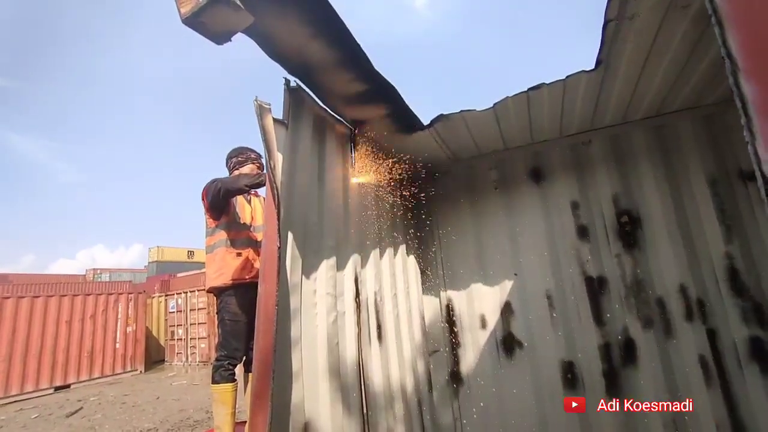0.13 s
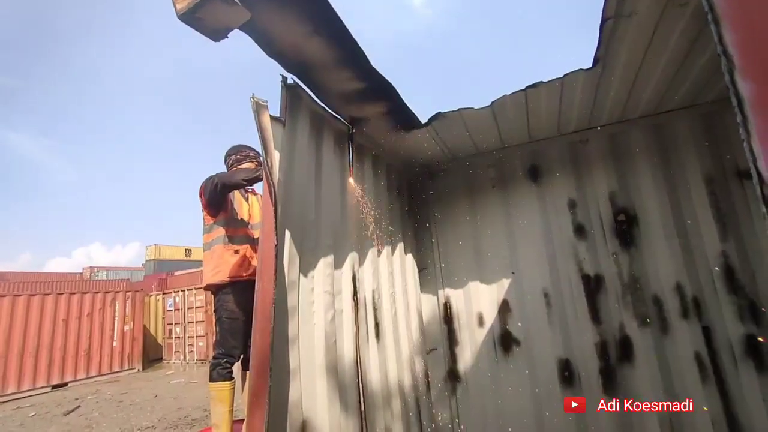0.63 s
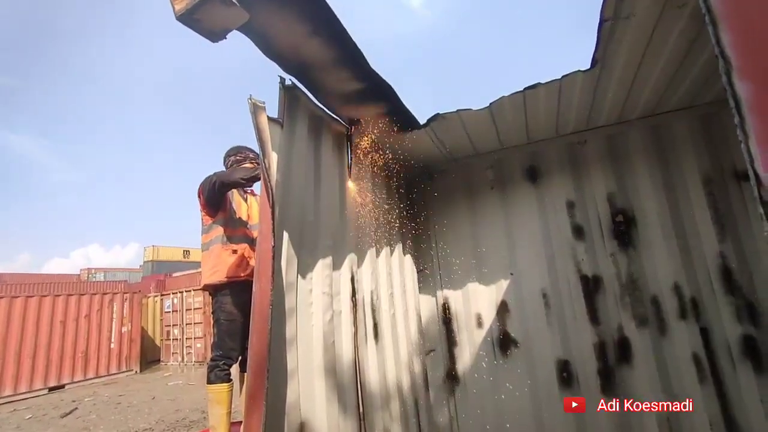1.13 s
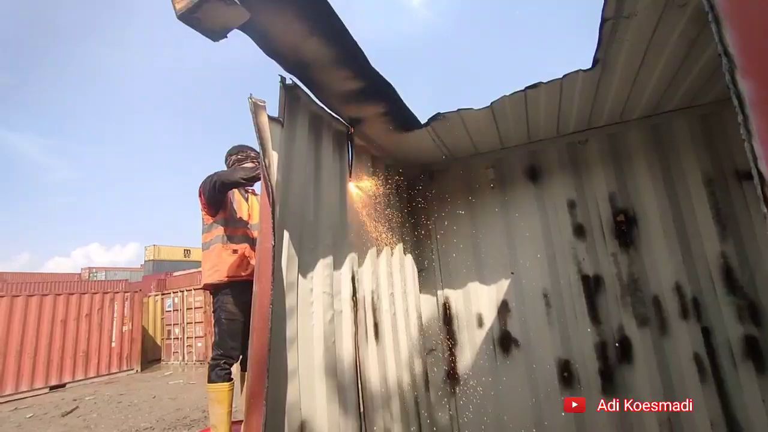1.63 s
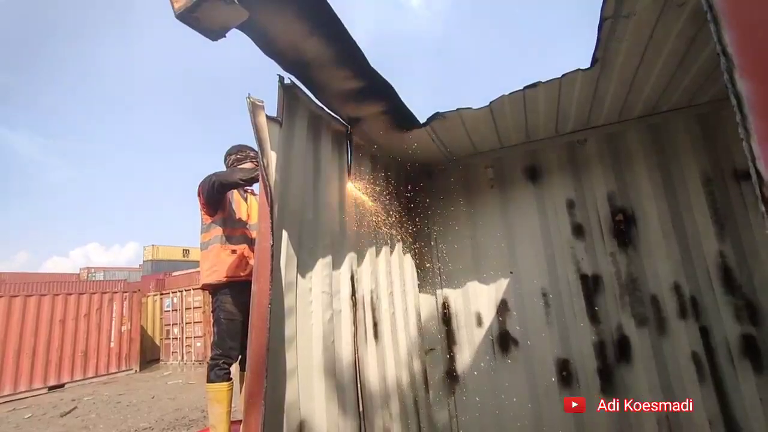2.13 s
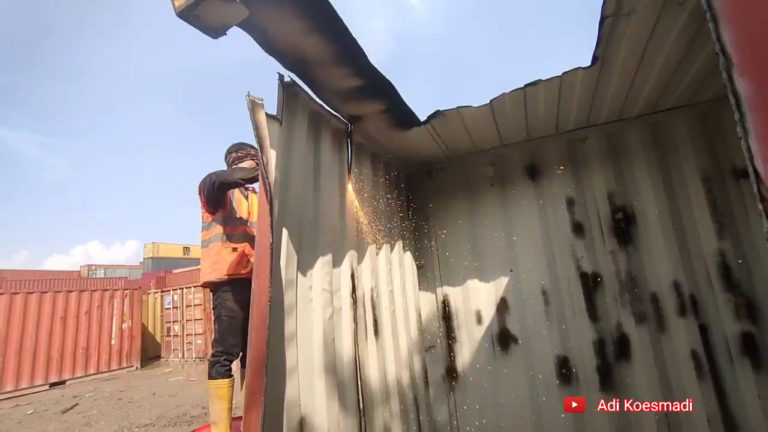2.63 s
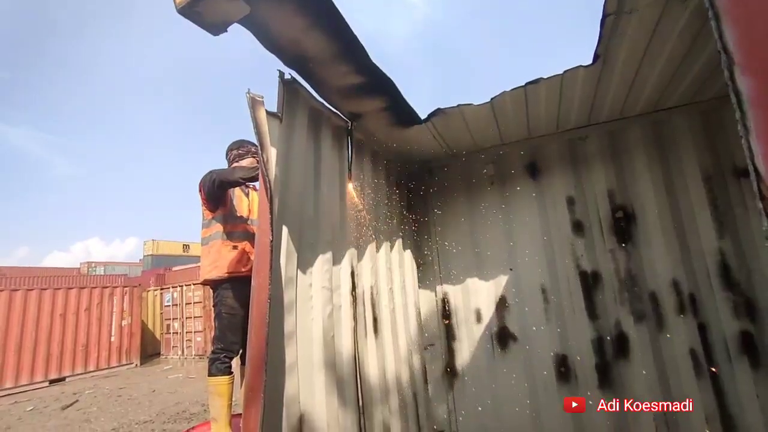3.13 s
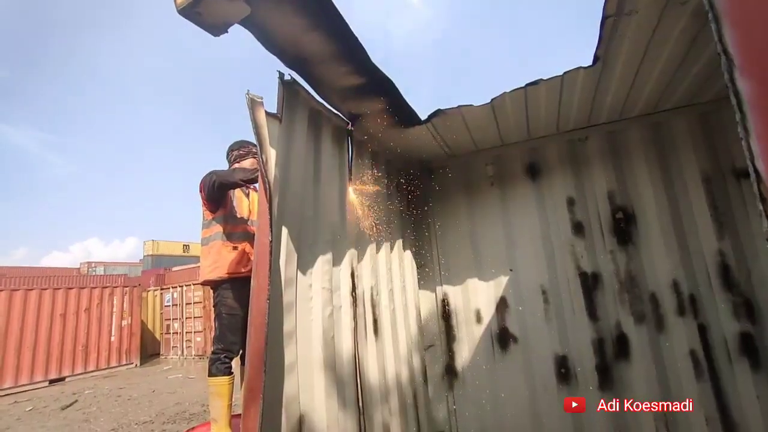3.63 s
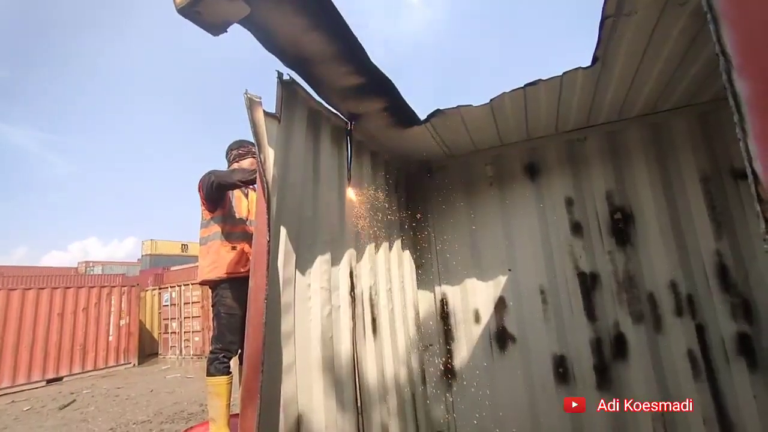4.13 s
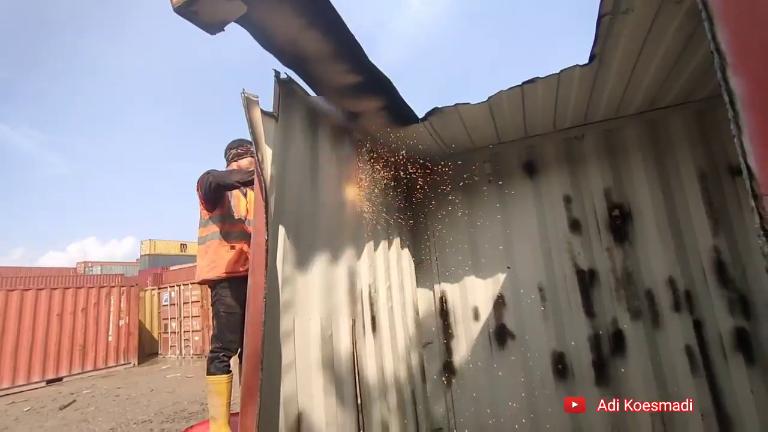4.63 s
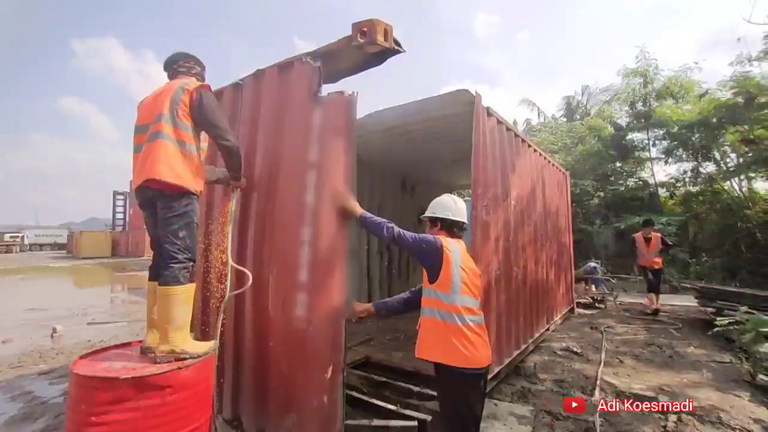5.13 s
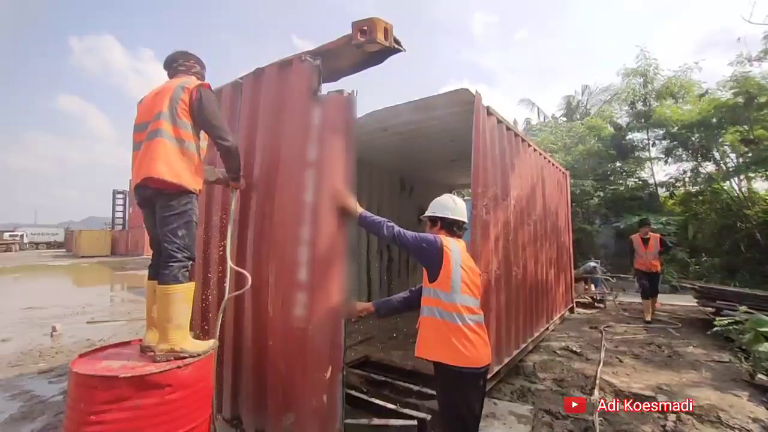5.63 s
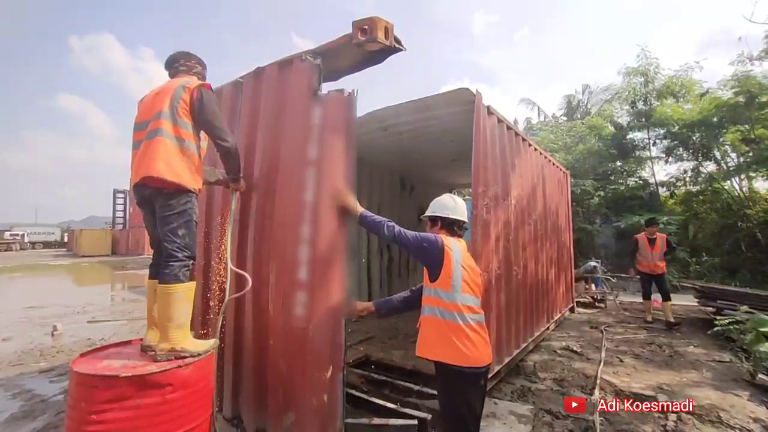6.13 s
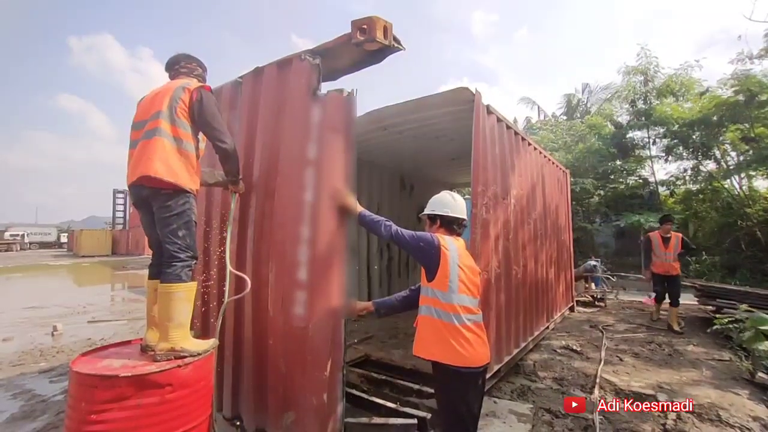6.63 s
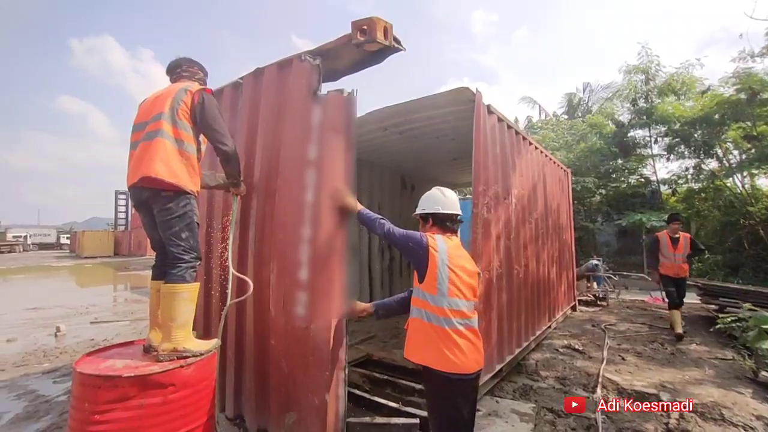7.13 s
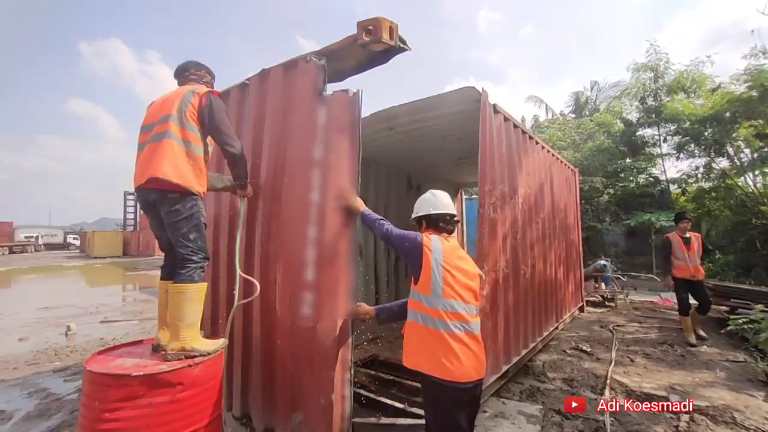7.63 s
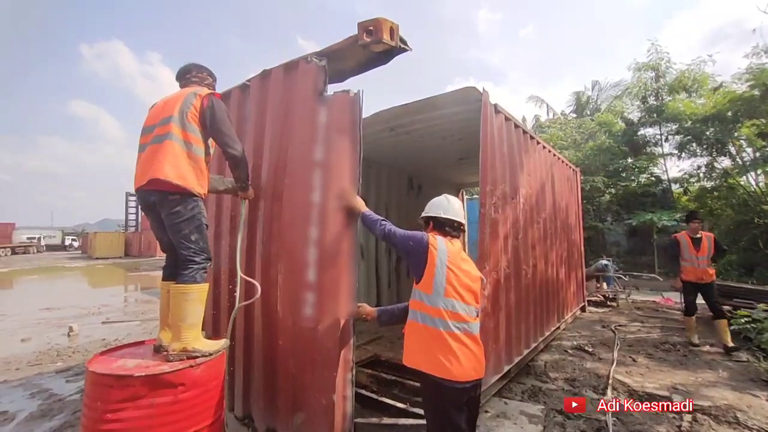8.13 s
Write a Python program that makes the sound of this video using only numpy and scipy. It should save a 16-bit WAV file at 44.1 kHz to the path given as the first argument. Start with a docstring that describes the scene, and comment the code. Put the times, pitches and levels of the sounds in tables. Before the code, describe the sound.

A cutting torch hisses and sizzles steadily inside a ringing steel box, stops dead briefly, then resumes outdoors over a fuller low engine rumble.

```python
"""An open yard, where an oxy-fuel torch cuts the wall of a steel container, heard first from inside the box and,
after a short silence, from outside. The torch is shaped noise in four fluttering bands: flame roar, kerf howl,
oxygen jet and spatter sizzle; resonances and short echoes make the sheet walls ring. Behind it a distant diesel
drones as a wavering sine, engine hums glide in and out, machines rumble as low noise bands,
and a light wind buffets the microphone ports as very low noise."""
import sys
import numpy as np
from scipy import signal
from scipy.fft import irfft, next_fast_len
from scipy.io import wavfile
from scipy.ndimage import uniform_filter1d

SR = 44100
rng = np.random.default_rng(int(sys.argv[2]) if len(sys.argv) > 2 else 0)


def field_ratio(decibels):
    """Amplitude ratio for a level in dB (20 dB per decade); scalars and array-likes work."""
    return 10 ** (np.asarray(decibels, dtype=float) / 20)


def generate_wav(sig):
    """Save sig (samples, or channels by samples) to the path in sys.argv[1] as 16-bit PCM at SR."""
    pcm = np.round(np.clip(np.atleast_2d(sig).T, -1, 1) * 32767).astype(np.int16)
    wavfile.write(sys.argv[1], SR, pcm)


N = 364266  # samples


def table(rows, x):
    """Columns of a table read at x along straight lines."""
    first, *columns = np.transpose(rows)
    return [np.interp(x, first, column) for column in columns]


def on_log(rows, hz):
    """A spectrum table read on a log-frequency axis."""
    rows = np.array(rows, float)
    return np.interp(np.log(hz), np.log(rows[:, 0]), rows[:, 1])


def unit(ears):
    """Scale both ears together so that their mean has rms 1."""
    return ears / np.sqrt(np.mean(ears.mean(0) ** 2))


def walk(rate, n):
    """Random levels held 1 / rate s and smoothed twice, pulled back to zero within a few steps; spread near 1."""
    hold = max(int(SR / rate), 2)
    steps = np.repeat(rng.standard_normal(n // hold + 1), hold)[:n]
    smooth = uniform_filter1d(uniform_filter1d(steps, hold), hold)
    drift = uniform_filter1d(smooth, 5 * hold)
    return 1.5 * (smooth - drift)


def sine(hz):
    """A tone of rms 1 that follows the frequency curve hz."""
    return np.sqrt(2) * np.sin(2 * np.pi * np.cumsum(hz) / SR)


# Diffuse stereo width, inside then outside. Each row: frequency in Hz, side minus mid in dB.
SIDE_SPECTRUM = [
    [(60, -9.5), (110, -11), (200, -12), (380, -14.5), (700, -13), (1290, -5.5), (2380, 0), (4400, 1),
     (8120, -1.5), (15000, -2)],
    [(60, -15), (110, -20), (200, -14.5), (380, -11), (700, -13), (1290, -1), (2380, -5), (4400, 0.5),
     (8120, 0.5), (15000, -1.5)],
]
# Stereo balance, inside then outside. Each row: frequency in Hz, left minus right in dB.
EAR_BALANCE = [
    [(60, -0.5), (110, -0.5), (200, 1), (380, 1.5), (700, -0.5), (1290, 2), (2380, 5), (4400, -2),
     (8120, 1.5), (15000, -1)],
    [(60, -2), (110, -1.5), (200, 1.5), (380, 1.5), (700, -0.5), (1290, 0.5), (2380, 4), (4400, -0.5),
     (8120, 2.5), (15000, 0)],
]
# Direct path from the source, one row for inside, one for outside.
# Each row: lead of the left port in seconds, level over the diffuse side part in dB.
DIRECT_PATH = [(.00004, -2.5), (.00028, -2)]


def wide_noise(place, hz, echo_db, echo_s):
    """Left and right noise spectra: alike in the bass, apart in the treble, each ear with its own wall echoes."""
    mid, side, direct = rng.standard_normal((3, len(hz))) + 1j * rng.standard_normal((3, len(hz)))
    spread = field_ratio(on_log(SIDE_SPECTRUM[place], hz))
    half_balance_db = on_log(EAR_BALANCE[place], hz) / 2
    # the direct path reaches the left port a little before the right
    lead_s, direct_db = DIRECT_PATH[place]
    skew = np.exp(1j * np.pi * hz * lead_s)
    shared_lags = rng.uniform(0.0994, 1, 6) * echo_s
    ears = []
    for sign in (1, -1):  # left, right
        lags = shared_lags + 6e-5 * rng.standard_normal(6)
        reflections = np.exp(-2j * np.pi * np.outer(lags, hz)).sum(0)
        echoes = 1 + field_ratio(echo_db) * reflections
        apart = sign * side + field_ratio(direct_db) * direct * skew ** sign
        ears.append((mid + spread * apart) * field_ratio(sign * half_balance_db) * echoes)
    return np.array(ears)


def flutter(parts, hz, s, lo_hz, hi_hz, all_db, near_db, own_db, rate):
    """Third-octave bands whose levels walk: all together, with neighbours and alone; a second part swells slowly."""
    ring_swell_db, ring_swell_rate = 4, 2.975  # rate in steps per second
    n, out, near = len(s), 0, 0
    together = walk(rate, n)
    centres = np.log2(lo_hz) + np.arange(int(3 * np.log2(hi_hz / lo_hz)) + 1) / 3
    for centre in centres:
        # cosine-squared skirts cross-fade each band into the next
        share = np.cos(np.pi / 2 * np.clip(3 * (np.log2(hz) - centre), -1, 1)) ** 2
        # each band inherits most of its lower neighbour's movement
        near = .8 * near + .6 * walk(rate / 2, n)
        level_db = all_db * together + near_db * near + own_db * walk(rate / 4, n)
        band, *rings = (irfft(part * share)[:, :n] for part in parts)
        # as the torch moves along the sheet its rings swell and fade
        for ring in rings:
            band = band + ring * field_ratio(ring_swell_db * walk(ring_swell_rate, n))
        out = out + band * field_ratio(level_db)
    return out


# Gusts on the ports, inside then outside. Each row: time in seconds, mean level in dB.
WIND_GUSTS = [
    [(0, -61), (1.5, -65), (2.5, -62), (4.5, -60)],
    [(4.9, -66), (5.8, -58), (6.3, -60), (7.4, -52), (7.7, -57), (8.26, -61)],
]


def wind(place, s):
    """Turbulence at the microphone ports: noise between about 14 and 45 Hz, partly shared by both ears."""
    low_pass = signal.butter(2, 45, fs=SR, output="sos")
    high_pass = signal.butter(2, 14, "high", fs=SR, output="sos")
    shared, left, right = signal.sosfilt(low_pass, rng.standard_normal((3, len(s))))
    puffs = signal.sosfilt(high_pass, shared + .7 * np.array([left, right]))
    gust_db = table(WIND_GUSTS[place], s)[0]
    return unit(puffs) * field_ratio(gust_db + 3.0 * walk(8, len(s)))


# Tone of the machines, inside then outside. Each row: frequency in Hz, relative density in dB per Hz.
MACHINE_COLOUR = [
    [(12, -30), (20, -1.5), (91, -9.5), (113, -12), (188, 3), (262, -5.5), (294, 11), (347, -7), (389, -7),
     (420, -2), (550, -32), (920, -120)],
    [(12, -34), (20, -4), (43, -13), (70, -14), (92, -5.5), (139, -7.5), (201, -1.5), (249, -2.5),
     (343, -0.5), (420, -7), (550, -37), (920, -120)],
]
# Other yard machines, inside then outside.
# Each row: time in seconds, deep rumble level in dB, boom of the box level in dB.
MACHINE_LEVELS = [
    [(0, -56.5, -52), (.5, -58.5, -53.5), (1.45, -60.5, -54), (1.85, -59, -52), (2.5, -60, -54.5),
     (2.9, -64.5, -55.5), (3.4, -60.5, -52.5), (3.9, -62, -57), (4.53, -63, -52)],
    [(4.89, -53, -41.5), (5.15, -53.5, -47), (5.7, -49, -46.5), (6.4, -51.5, -44), (6.8, -54.5, -45.5),
     (7.8, -52.5, -47), (8.26, -51, -43)],
]


def machines(place, s, hz):
    """Low noise of yard machines in two bands, a deep rumble and the boom of the box, with faint echoes."""
    rumble_db, boom_db = table(MACHINE_LEVELS[place], s)
    far = wide_noise(place, hz, echo_db=-34.5, echo_s=0.022) * field_ratio(on_log(MACHINE_COLOUR[place], hz))
    rumble = flutter([far], hz, s, 62.5, 130, all_db=.5, near_db=.8, own_db=1.2, rate=16)
    boom = flutter([far], hz, s, 157.5, 260, all_db=.5, near_db=.8, own_db=1.2, rate=16)
    return unit(rumble) * field_ratio(rumble_db) + unit(boom) * field_ratio(boom_db)


# Engine hums that come and go.
# Each row: start in seconds, end in seconds, first mean pitch in Hz, last mean pitch in Hz, mean level in dB.
ENGINE_HUMS = [(1.801, 2.72, 87.1, 90.2, -59), (5.6, 6.65, 85.3, 88.8, -55.5),
               (6.9, 7.55, 117.6, 114.6, -55), (5.05, 5.5, 206, 215.5, -50), (6.3, 6.604, 212, 204, -49),
               (6.55, 7.197, 183, 193, -48), (6.8, 7.85, 232.7, 251, -49), (7.4, 8.26, 198, 205.7, -48.5)]


def hum():
    """Soft low tones of engines far off: gliding sines, each of which swells, wavers and fades."""
    out = np.zeros(N)
    for start_s, end_s, first_hz, last_hz, db in ENGINE_HUMS:
        i = np.arange(int(start_s * SR), min(int(end_s * SR), N))
        hz = np.linspace(first_hz, last_hz, len(i)) * (1 + 0.005 * walk(7.1, len(i)))
        to_nearest_end_s = np.minimum(i / SR - start_s, end_s - i / SR)
        fade = np.clip(to_nearest_end_s / 0.095, 0, 1)
        out[i] += sine(hz) * field_ratio(db + 2.5 * walk(6.8, len(i))) * fade
    return out


# Nearest diesel, inside then outside. Each row: time in seconds, mean firing rate in Hz, mean drone level in dB.
DIESEL_DRONE = [
    [(0, 41, -74), (.4, 41.3, -66.5), (1.7, 40.4, -58), (2.06, 40.8, -56), (2.45, 41.1, -71),
     (2.9, 41.4, -68), (3.15, 40.9, -62), (3.7, 41, -61), (4.3, 41.2, -52.5), (4.53, 41, -58)],
    [(4.89, 45.55, -53), (5.5, 42.94, -60), (5.73, 43.4, -50), (6.15, 43.1, -51), (6.55, 44, -46),
     (6.8, 43.6, -55), (7.15, 39.6, -50), (7.42, 39.4, -45), (7.65, 43, -50), (7.85, 43.7, -51.5),
     (8.26, 44.2, -55)],
]


def diesel(place, s):
    """An uneven engine drone: one sine at the firing rate, wavering in pitch and level."""
    fire_hz, drone_db = table(DIESEL_DRONE[place], s)
    fire_hz = fire_hz * (1 + .04 * walk(14, len(s)))
    return sine(fire_hz) * field_ratio(drone_db + 3.0 * walk(11, len(s)))


# Tone of the gas noise, inside then outside. Each row: frequency in Hz, relative density in dB per Hz.
GAS_COLOUR = [
    [(200, -39), (300, -15.5), (400, -20), (700, -17.5), (1000, -13), (1650, -9.5), (2100, -3),
     (3100, -5.5), (4000, -2.5), (5600, -2.5), (6800, -9), (8400, -16), (11000, -14), (12300, -18),
     (13600, -15.5), (15500, -16)],
    [(200, -39.5), (300, -13), (360, -16.5), (600, -13.5), (1030, -14.5), (1450, -8.5), (2100, 1),
     (3100, -4.5), (4300, -1.5), (5800, -3), (7000, -13.5), (9200, -14.5), (10900, -14), (12200, -15),
     (13400, -14), (15500, -18.5)],
]
# Rings of the sheet walls, inside then outside. Each row: frequency in Hz, width in Hz, lift in dB.
WALL_RINGS = [
    [(478, 60, 8.5), (810, 47, 5), (1156, 86, 6.5), (1513, 32, 8.5), (1965, 73, 5), (2260, 46, 7),
     (2410, 72, -1.5), (4045, 44, 6), (4530, 37, 4.5), (4860, 50, 6.5), (5710, 220, 4.5), (6670, 170, 5.5)],
    [(490, 130, 5), (808, 80, 6.5), (1188, 140, 4), (1630, 44, 1.5), (1950, 60, -2), (2184, 39, 4),
     (2846, 68, 3.5), (3820, 92, 4), (4150, 100, 2), (4625, 180, 4), (5900, 170, -2), (6170, 150, -1.5)],
]


def torch_gas(place, hz):
    """Turbulent gas spectra with wall echoes: the plain noise, and what the wall resonances add to it."""
    ring_db = 0
    for mode_hz, width_hz, lift_db in WALL_RINGS[place]:
        ring_db = ring_db + lift_db / (1 + (2 * (hz - mode_hz) / width_hz) ** 2)
    plain = wide_noise(place, hz, echo_db=-17.5, echo_s=.03) * field_ratio(on_log(GAS_COLOUR[place], hz))
    return [plain, plain * (field_ratio(ring_db) - 1)]


def thirds_up(steps):
    """Frequency in Hz that lies so many third octaves above 315 Hz."""
    return 315 * 2 ** (steps / 3)


# Roar level under the howl, one row for inside, one for outside. Each row: at the start in dB, at the end in dB.
ROAR_UNDER_HOWL = [(-7.5, -8.5), (-6.5, -6)]


def flame_roar(place, gas, hz, s, flame_db):
    """The flame's low turbulence: the gas noise from 315 Hz up to the howl."""
    roar_db = flame_db + np.linspace(*ROAR_UNDER_HOWL[place], len(s))
    roar = flutter(gas, hz, s, thirds_up(0), thirds_up(6.5), all_db=0.48, near_db=0.6, own_db=0.66, rate=24)
    return unit(roar) * field_ratio(roar_db)


def kerf_howl(gas, hz, s, flame_db):
    """The howl of the kerf, driven by the flame: gas noise around 1.6 to 2.5 kHz."""
    howl = flutter(gas, hz, s, thirds_up(7), thirds_up(9.5), all_db=0.5, near_db=0.6, own_db=0.5, rate=30)
    return unit(howl) * field_ratio(flame_db)


def oxygen_jet(gas, hz, s, jet_db):
    """The hiss of the turbulent oxygen jet: gas noise around 3 to 6 kHz."""
    jet = flutter(gas, hz, s, thirds_up(10), thirds_up(13.5), all_db=0.53, near_db=0.55, own_db=0.35, rate=30)
    return unit(jet) * field_ratio(jet_db)


# Spatter sizzle, inside then outside. Each row: time in seconds, level over the jet in dB.
SIZZLE_OVER_JET = [
    [(0, -8), (.9, -7.5), (1.3, -11), (1.6, -8.5), (2.2, -10.5), (2.9, -8), (3.35, -9.5), (4.4, -7.5),
     (4.53, -8.5)],
    [(4.89, -12.5), (5.1, -14), (5.8, -10.5), (6.2, -13), (7.1, -12), (7.9, -10), (8.26, -9.5)],
]


def spatter_sizzle(place, gas, hz, s, jet_db):
    """The sizzle of the spatter: gas noise from about 8 kHz up, following the jet."""
    sizzle_db = jet_db + table(SIZZLE_OVER_JET[place], s)[0]
    sizzle = flutter(gas, hz, s, thirds_up(14), thirds_up(17.1), all_db=-0.6, near_db=0.9, own_db=-0.4, rate=30)
    return unit(sizzle) * field_ratio(sizzle_db)


# Torch controls, inside then outside; the flame drives the kerf howl and the roar.
# Each row: time in seconds, oxygen jet level in dB, flame level in dB.
TORCH_CONTROLS = [
    [(0, -25, -33), (.11, -26.5, -27.5), (.34, -29.5, -32.5), (.95, -24.5, -28.5), (1.25, -26, -30.5),
     (1.42, -24.5, -32), (1.7, -26.5, -32), (2.0, -24.5, -29), (2.2, -26.5, -29), (2.72, -24.5, -32),
     (2.9, -27.5, -30.5), (3.25, -26, -32), (3.6, -25.3, -30.5), (4.1, -25.5, -32.5), (4.53, -26, -29.5)],
    [(4.89, -25, -30), (5.3, -25, -30.5), (5.58, -26, -31.5), (5.75, -25.5, -30.5), (6.3, -25, -30.5),
     (6.55, -26, -32), (6.72, -24, -29.5), (7.02, -25, -31), (7.25, -27.5, -32), (7.47, -25, -30.5),
     (7.72, -26.5, -32.5), (8.26, -26, -31)],
]


def torch(place, s, hz):
    """One body of turbulent gas heard as roar, howl, jet and sizzle, ringing in the walls."""
    jet_db, flame_db = table(TORCH_CONTROLS[place], s)
    gas = torch_gas(place, hz)
    mix = flame_roar(place, gas, hz, s, flame_db) + kerf_howl(gas, hz, s, flame_db)
    mix = mix + oxygen_jet(gas, hz, s, jet_db) + spatter_sizzle(place, gas, hz, s, jet_db)
    # molten drops leaving the kerf roughen the whole flame at once
    spatter_db = 0.52 * walk(120, len(s)) + 0.26 * walk(18, len(s))
    return mix * field_ratio(spatter_db)


# The two listening places, inside the box, then outside. Each row: start in seconds, end in seconds.
LISTENING_PLACES = [(0, 4.6), (4.74, 8.26)]


def scene():
    """Both listening places in turn, over the far hums."""
    out = np.zeros((2, N)) + hum()
    for place, (start_s, end_s) in enumerate(LISTENING_PLACES):
        i = np.arange(int(start_s * SR), min(int(end_s * SR) + 1, N))
        s = i / SR
        size = 2 * next_fast_len(len(i) // 2 + 1)
        # the lowest bin is lifted off zero so that its logarithm exists
        hz = np.maximum(np.arange(size // 2 + 1), 1) * SR / size
        out[:, i] += wind(place, s) + machines(place, s, hz) + diesel(place, s) + torch(place, s, hz)
    return out


# The sound is cut off, stays silent and fades in again. Each row: time in seconds, gain in dB.
GAP_GAIN = [(4.534, 0), (4.537, -22), (4.566, -70), (4.57, -120), (4.8, -120), (4.806, -47), (4.812, -22),
            (4.822, -7), (4.86, -6), (4.89, 0)]


def silence_gap(mix):
    """An edit that silences the gap between the two places."""
    return mix * field_ratio(table(GAP_GAIN, np.arange(N) / SR)[0])


def cut_top(mix):
    """The recorder's steep treble limit: an elliptic low-pass at 15480 Hz."""
    return signal.sosfilt(signal.ellip(12, .3, 70, 15480, fs=SR, output="sos"), mix)


def top_cut(x):
    """Nothing passes above the cut-off."""
    return signal.sosfilt(signal.butter(12, 16640, fs=SR, output="sos"), x)


def record(dry):
    """The finished mix: the gap silenced, then the top cut."""
    finished = cut_top(silence_gap(dry))
    return top_cut(finished)


dry = scene()
out = record(dry)
generate_wav(out)
```